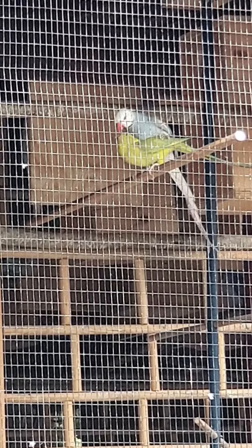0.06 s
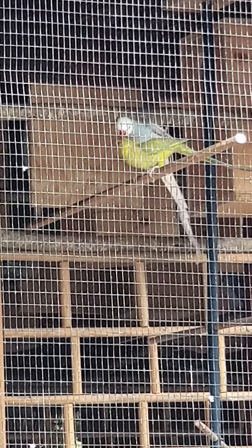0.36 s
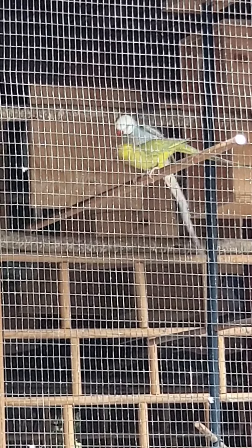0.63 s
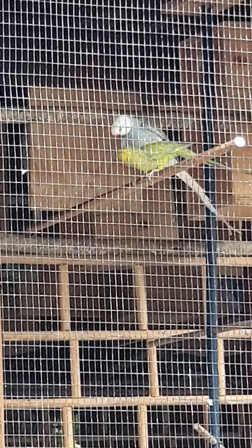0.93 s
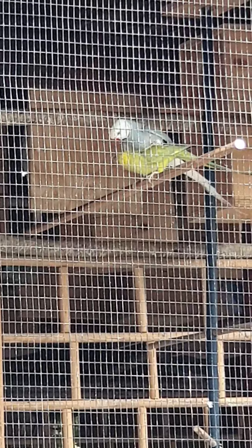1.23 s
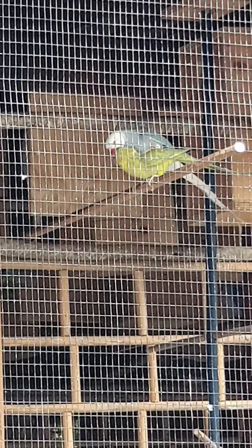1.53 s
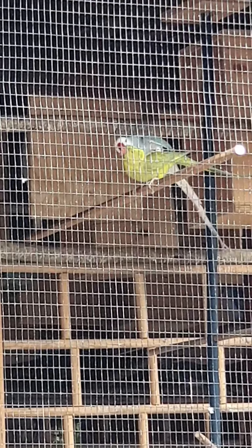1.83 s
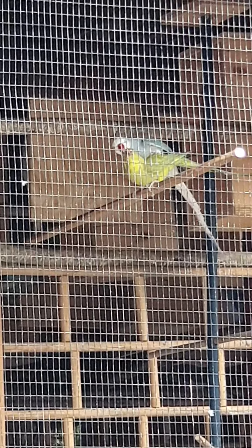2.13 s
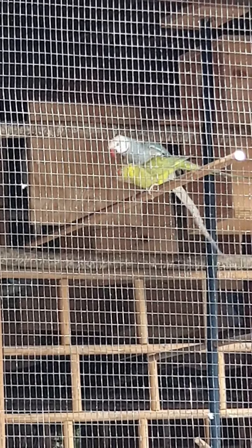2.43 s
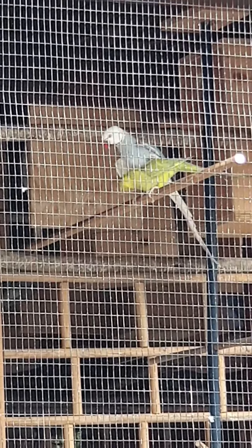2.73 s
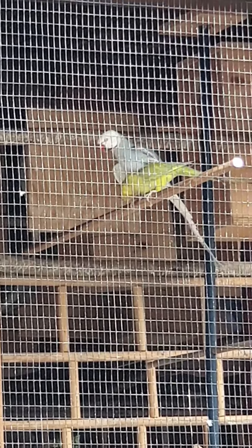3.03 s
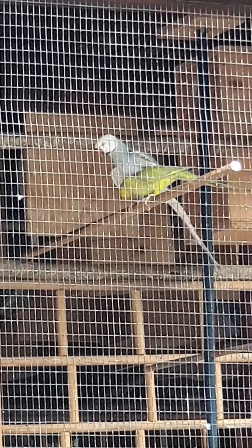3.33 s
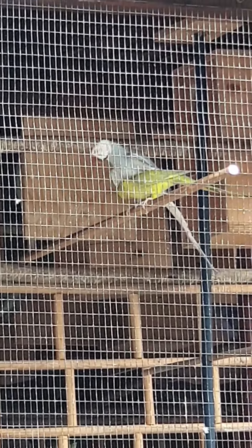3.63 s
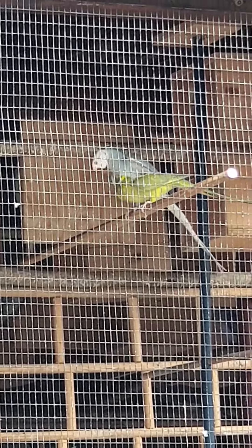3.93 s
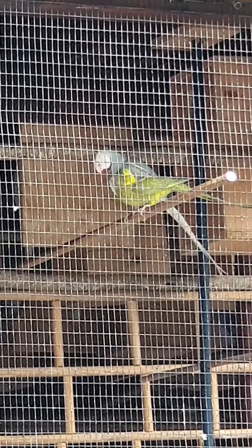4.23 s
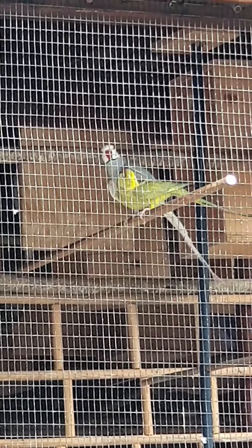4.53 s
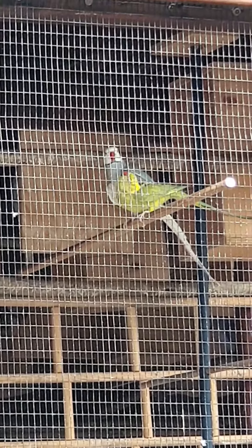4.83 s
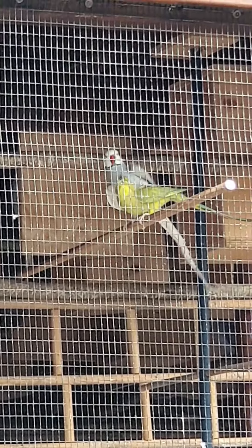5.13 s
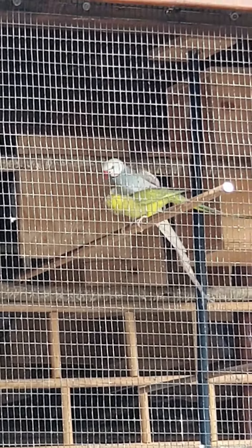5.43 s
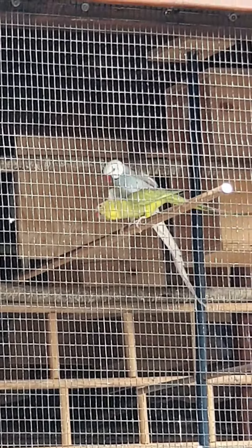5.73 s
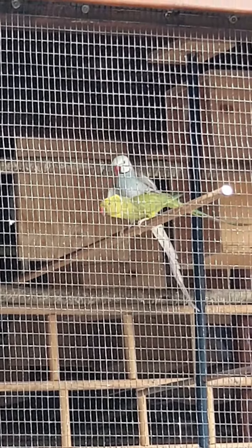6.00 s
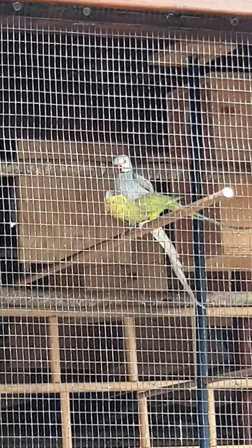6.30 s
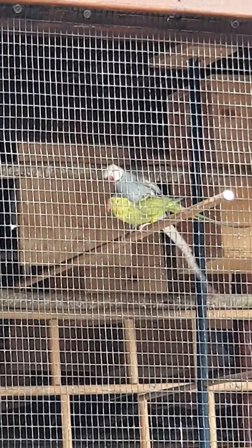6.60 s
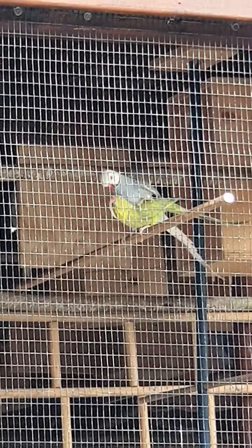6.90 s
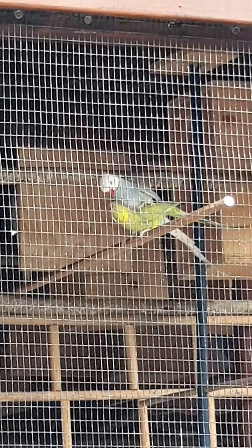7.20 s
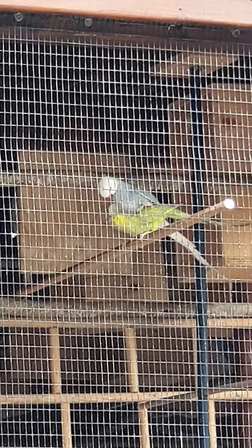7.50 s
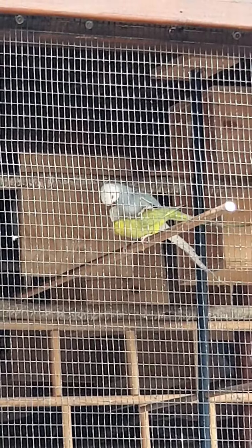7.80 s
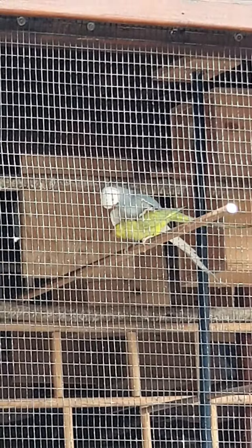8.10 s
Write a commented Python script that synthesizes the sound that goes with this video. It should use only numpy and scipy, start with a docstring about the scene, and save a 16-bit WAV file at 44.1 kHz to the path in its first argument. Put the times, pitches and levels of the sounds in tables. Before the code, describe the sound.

Parakeets call in an aviary a few metres away, with a short echo from the roof and walls, over a low outdoor rumble and faint flock chatter. A sharp falling squeal comes at about 0.7 seconds. From 1.5 to 5.3 seconds, scratchy falling squeals follow one another, mixed with thin, high peeps, while the distant flock grows slightly louder. At about 4.8 seconds a rooster close by, a little to the right, softly shakes its feathers. From 5.3 to 6.3 seconds it claps its wings seven times, each a sharp crack with a thump of air. At 6.6 seconds it starts a loud, high crow in three parts, hoarse and rasping in the middle, then clearer on a long last note that lasts to about 8 seconds. The parakeets keep peeping and squealing behind it.

```python
"""In a wire aviary with a hard roof, parakeets squeal and peep over the far chatter of the flock.
Each squeal is a falling tone, coloured by throat and beak and echoed by roof and walls.
A rooster close by shakes its feathers and claps its wings seven times, each a crack and a thump of air.
Then it crows with a high, rasping voice, hoarse in the middle and clear at the end.
A low outdoor rumble lies under it all."""
import sys
import numpy as np
from scipy import signal
from scipy.fft import rfft, irfft, next_fast_len
from scipy.io import wavfile
from scipy.ndimage import map_coordinates

SR = 44100
rng = np.random.default_rng(int(sys.argv[2]) if len(sys.argv) > 2 else 0)


def to_wav(s):
    """Save 16-bit WAV."""
    ch = np.atleast_2d(s).T  # columns
    pcm = np.round(np.clip(ch, -1, 1) * 32767)  # PCM
    wavfile.write(sys.argv[1], SR, pcm.astype(np.int16))


N = 359415
T = np.arange(N) / SR
TOP_HZ = 15800  # upper edge of the sound
ROOSTER_LAG = -8  # samples; the rooster reaches the left side first

# how a parakeet's throat and beak colour its voice: (frequency [Hz], level [dB])
BEAK = [(700, -60), (1300, -13.5), (2000, -10.5), (2750, 1.5), (3400, 8), (4300, 3), (5500, -1.5),
        (7000, -6), (9000, -5.5), (12000, -9.5), (15500, -30.5)]


def amp(db):
    """Turn decibels into a factor to multiply by."""
    return 10 ** (np.asarray(db) / 20)


def unit(x):
    """Scale a sound to an average strength (rms) of 1."""
    return x / np.sqrt(np.mean(x ** 2) + 1e-18)


def curves(table):
    """Join the rows of a table into lines through time; the first column is the time."""
    times, *columns = np.transpose(table)
    return [np.interp(T, times, column) for column in columns]


def response(points, hz):
    """Read the gain at hz from a table of (frequency [Hz], level [dB])."""
    table_hz, db = np.transpose(points)
    return amp(np.interp(np.log(hz + 1), np.log(table_hz), db))


def noise(points, size):
    """Noise of strength 1, coloured by a table of (frequency [Hz], level [dB])."""
    n = next_fast_len(size)
    spectrum = rfft(rng.standard_normal(n)) * response(points, np.arange(n // 2 + 1) * SR / n)
    return unit(irfft(spectrum, n)[:size])


def wobble(hz, size):
    """A smooth random wiggle, roughly 1 in size, that moves up to about hz times a second."""
    knots = rng.standard_normal(size // 16 + 8)
    return map_coordinates(knots, [np.arange(size) * min(2 * hz / SR, 1 / 16)], order=3, mode="mirror")


def add(track, start_s, x):
    """Mix the sound x into the track from start_s on."""
    i = max(int(start_s * SR), 0)
    track[i:i + len(x)] += x[:max(len(track) - i, 0)]


def late(x, delay_s):
    """The same sound, delay_s seconds later."""
    return np.interp(T - delay_s, T, x, left=0)


def aviary(x, echo_db, pan_db, lag_samples, ring_s, treble_ring_s, wall_db=-12, build_s=0.017):
    """Left and right get the direct sound, six bounces off roof and walls, then a dulling echo."""
    t = T[:SR]
    white = rng.standard_normal((2, SR))
    low = signal.sosfilt(signal.butter(1, 5000, fs=SR, output="sos"), white)
    # long waves reach both sides alike
    low = low + signal.sosfilt(signal.butter(1, 600, fs=SR, output="sos"), low[0] - low)
    tail = low * amp(-60 * t / ring_s) + (white - low) * amp(-60 * t / treble_ring_s)
    echo = amp(echo_db) * unit(tail * (1 - np.exp(-t / build_s))) / np.sqrt(SR)
    for when, side in rng.random((6, 2)):
        bounce_s = .004 + .024 * when
        echo[0, int(bounce_s * SR)] += amp(wall_db)
        echo[1, int((bounce_s + .0006 * (side - .5)) * SR)] += amp(wall_db)
    direct = np.array([np.roll(x, lag_samples), x])
    balance = amp(np.array([[pan_db], [-pan_db]]) / 2)  # below 0 dB leans to the right
    return (direct + signal.fftconvolve(x[None], echo, axes=1)[:, :N]) * balance


def yard(level_db=-51, side_db=-8, pan_db=-4.5):
    """Low outdoor rumble and a faint wash of far birds, swelling slowly."""
    # colour of the outdoor background: (frequency [Hz], level [dB])
    background = [(15, -63), (25, -13), (92, -3), (111, -4), (127, -14.5), (249, -12.5), (270, -11),
                  (641, -15), (840, -15), (1160, -21), (3720, -8.5), (4140, -7), (9070, -23),
                  (14000, -29.5), (16000, -44)]
    mid, side = noise(background, N), amp(side_db) * noise(background, N)
    swell_db = level_db + 0.26 * wobble(1.42, N)
    return np.array([mid + side, mid - side]) * amp(swell_db + np.array([[pan_db], [-pan_db]]) / 2)


def squeal(hold_s, fall_s, top_hz, end_hz, opening_db, rough, bend=1.45, scoop=.12, scratch=0.72):
    """A scratch, a held note, then a bright fall; the overtones slide through the beak's resonance."""
    t = np.arange(int((hold_s + fall_s + 0.015) * SR)) / SR
    fallen = np.clip((t - hold_s) / fall_s, 0, None)  # 0 while held, 1 at end_hz
    onset = np.exp(-(t / .035) ** 2)
    opening = 1 - np.clip(fallen / .35, 0, 1)
    # the voice turns harsher as it falls
    waver = .018 * wobble(60, len(t)) + .085 * (rough + .3 * fallen) * wobble(420, len(t))
    hz = (top_hz + (end_hz - top_hz) * fallen ** bend) * (1 - scoop * onset) * (1 + waver)
    phase = 2 * np.pi * np.cumsum(hz) / SR
    # the harder the bird pushes, the richer the overtones
    push_db = opening_db * opening - 3 * fallen ** 4
    tone = np.zeros(len(t))
    for k in range(1, 9):
        gain = response(BEAK, k * hz) * amp(push_db * max(k - 2, 0) + 1.6 * wobble(24.85, len(t)))
        tone += gain * (k * hz < TOP_HZ) * np.sin(k * phase)
    hiss = noise(BEAK, len(t)) * (1 + np.cos(phase) / 2) * (rough + 0.017 + scratch * onset)
    flutter = amp(2.5 * wobble(90, len(t)))
    fades = np.clip(t / .016, 0, 1) * np.clip((t[-1] - t) / .015, 0, 1)
    effort = amp(push_db - 0.7 * onset) * fades
    voice = (unit(tone) * (1 - onset / 2) + hiss) / np.sqrt(1 + rough ** 2) * effort * flutter
    # so small a beak gives off no bass
    return signal.sosfilt(signal.butter(3, 1150, "high", fs=SR, output="sos"), voice)


def flock(count=44, far_db=-58, scatter_db=3, lively_db=5):
    """Birds in further cages, heard mostly as echo; they grow louder from 1.3 to 3 seconds."""
    out = np.zeros(N)
    for k, (when, pitch, length, strength) in enumerate(rng.uniform(-1, 1, (count, 4))):
        start = (k + .5 + .5 * when) * T[-1] / count
        call = squeal(hold_s=.06 + .02 * length, fall_s=.09, top_hz=2200 + 500 * pitch,
                      end_hz=1650 + 200 * pitch, opening_db=-2.3, rough=0.683)
        db = far_db + scatter_db * strength + lively_db * np.interp(start, [1.3, 3], [0, 1])
        add(out, start, amp(db) * call)
    return aviary(out, echo_db=10, pan_db=0, lag_samples=0, ring_s=0.32, treble_ring_s=0.022)


def whistle(length_s, start_hz, end_hz, second_db, third_db, rasp_db=-14):
    """A slightly husky note with two overtones that settles from its first pitch to its last."""
    size = int(length_s * SR)
    progress = np.linspace(0, 1, size)
    waver = .016 * wobble(60, size) + .032 * wobble(450, size)
    hz = (end_hz + (start_hz - end_hz) * (1 - progress) ** 1.675) * (1 + waver)
    phase = 2 * np.pi * np.cumsum(hz) / SR
    tone = np.sin(phase) + amp(second_db) * np.sin(2 * phase) + amp(third_db) * np.sin(3 * phase)
    voice = np.sqrt(2) * tone + amp(rasp_db) * noise(BEAK, size)
    fades = np.clip(progress / 0.1, 0, 1) * np.clip((1 - progress) / 0.13, 0, 1)
    return voice * fades * amp(-4 * progress + 3.3 * wobble(79, size))


def parakeets(squeal_db=-1, note_db=-2, squeal_end_hz=1584, climb_hz_per_s=19000, droop=0.0539):
    """The near birds, a few metres off behind the wire, and a few low calls from beyond them."""
    # faint far calls: (start [s], length [s], start pitch [Hz], end pitch [Hz], level [dB])
    far_calls = [(0.504, 0.1, 824, 589, -57), (1.499, 0.42, 659, 790, -66), (3.521, 0.213, 800, 736, -55)]
    # falling squeals:
    # (start [s], end [s], top pitch [Hz], level [dB], opening against the fall [dB], roughness [0-1])
    squeals = [(0.655, 0.802, 2285, -24.5, 0, 0), (1.479, 1.63, 2702, -27, -7, 0.24),
               (1.616, 1.775, 2846, -27, -2, 0.08), (2.121, 2.292, 2692, -28.5, -6, 0.19),
               (2.688, 2.855, 2860, -28, -7, .25), (2.936, 3.082, 2574, -28, -6.5, 0.08),
               (3.175, 3.325, 2488, -30.5, -8, 0.22), (3.447, 3.627, 2775, -25.5, -6, 0.2),
               (3.687, 3.826, 2535, -27.5, -4, 0.1), (3.897, 4.049, 2680, -31, -4.5, 0.4),
               (4.273, 4.456, 2816, -26, -7, 0.23), (4.392, 4.529, 2540, -26, -13, 0.33),
               (5.12, 5.298, 2800, -24, -2.5, 0.18), (7.004, 7.155, 2577, -27.5, -10, 0.21),
               (7.486, 7.637, 2636, -27.5, -1.5, 0.41), (7.653, 7.778, 2636, -33.5, -7.5, 0.6)]
    # soft nasal chatter, rich in overtones: (start [s], length [s], pitch [Hz], level [dB])
    chatter = [(1.058, 0.08, 1778, -47), (1.393, .095, 1753, -46.5), (1.92, 0.17, 1383, -56)]
    # thin, nearly pure peeps: (start [s], length [s], pitch [Hz], level [dB])
    peeps = [(1.511, 0.066, 3820, -25), (2.159, 0.055, 3640, -27.5), (2.376, 0.074, 3560, -37),
             (2.95, 0.093, 3500, -26), (3.196, 0.06, 3460, -31.5), (3.731, 0.044, 3400, -24),
             (4.651, 0.099, 3986, -39.5), (5.153, 0.071, 3530, -25), (5.597, 0.097, 3200, -30),
             (5.939, 0.12, 3770, -32.5), (6.214, 0.092, 4550, -35), (6.256, 0.0696, 3780, -29),
             (6.555, 0.096, 4000, -45), (6.797, 0.15, 2900, -43.5), (7, 0.084, 3540, -27),
             (7.596, 0.12, 3740, -30)]
    out = np.zeros(N)
    for start, end, top_hz, db, opening_db, rough in squeals:
        hold_s = (top_hz - squeal_end_hz) / climb_hz_per_s  # higher squeals hold their opening longer
        call = squeal(hold_s, end - start - hold_s, top_hz, squeal_end_hz, opening_db, rough)
        add(out, start, amp(db + squeal_db) * call)
    for notes, second_db, third_db in [(peeps, -29, -18), (chatter, 0.5, -0.5)]:
        for start, length, hz, db in notes:
            call = whistle(length, hz, hz * (1 - droop), second_db, third_db)
            add(out, start, amp(db + note_db) * call)
    for start, length, start_hz, end_hz, db in far_calls:
        call = whistle(length, start_hz, end_hz, second_db=-26, third_db=-6)
        add(out, start, amp(db + note_db) * call)
    hollow_call = whistle(length_s=0.048, start_hz=1448, end_hz=1122, second_db=-35, third_db=-4.5)
    add(out, 4.637, amp(-28) * hollow_call)
    return aviary(out, echo_db=-0.5, pan_db=-1.9, lag_samples=2,
                  ring_s=0.54, treble_ring_s=0.4, wall_db=-13.5)


def gust(start_s, rise_s=0.01, hold_s=0.026, fade_db_per_s=129):
    """The strength of the air stirred by one wing stroke: it rises, holds and dies away."""
    age = T - start_s
    return np.clip(age / rise_s, 0, 1) * amp(-fade_db_per_s * np.maximum(age - hold_s, 0))


def wings(crack_s=0.0032, rustle_s=0.0018, thump_hz=138, thump_s=0.013, full_clap_db=-16):
    """Each clap is a crack of feathers and a thump of air; the ground and then a wall send it back."""
    # a soft shake, seven claps and a last light flick: (time [s], crack level [dB], thump level [dB])
    strokes = [(4.831, -27.5, -30.5), (4.93, -33.5, -28), (4.981, -38, -33.5), (5.091, -28.5, -32.5),
               (5.345, -12, -30), (5.482, -12.5, -26.5), (5.629, -12, -18.5), (5.787, -14, -21),
               (5.95, -16, -22), (6.117, -11, -34.5), (6.295, -11, -32.5), (6.601, -28.5, -61)]
    # colour of the cracking feathers: (frequency [Hz], level [dB])
    crack = [(150, -16.5), (500, 9), (900, 5.5), (1600, 8), (2700, 2), (4000, 3.5), (5400, 8), (7200, 2.5),
             (10500, -0.5), (13000, -0.5), (16000, -16)]
    # colour of the stirred air: (frequency [Hz], level [dB])
    draught = [(25, -45), (60, 8), (140, -2), (220, -2.5), (340, -2), (700, -16), (2000, -10.5),
               (6000, -19), (14000, -27)]
    out, t = np.zeros(N), T[:SR // 5]
    attack = 1 - np.exp(-t / 0.0004)
    for start, crack_db, thump_db in strokes:
        feathers = noise(crack, len(t)) * (np.exp(-t / crack_s) + amp(-18) * np.exp(-t / rustle_s))
        # strokes softer than a full clap thump lower, by an octave for every 20 dB
        hz = thump_hz * 2 ** (min(crack_db - full_clap_db, 0) / 20)
        thump = np.sin(2 * np.pi * hz * t * rng.uniform(.92, 1.12)) * np.exp(-t / thump_s)
        add(out, start, (amp(crack_db) * feathers + amp(thump_db) * thump) * attack)
    ground = amp(-6) * late(out, .0052)
    wall = amp(-7) * signal.sosfilt(signal.butter(1, 5000, fs=SR, output="sos"), late(out, .033))
    # the harder the stroke, the more air it stirs
    gusts = sum(amp((crack_db + thump_db) / 2) * gust(start) for start, crack_db, thump_db in strokes)
    air = amp(-13) * gusts * noise(draught, N)
    return aviary(out + ground + wall + air, echo_db=-5, pan_db=-3, lag_samples=ROOSTER_LAG,
                  ring_s=0.41, treble_ring_s=0.34, wall_db=-22)


def crow_effort(syllables, end_s=8.33, slack_hz=696, rise_bend=2.4, sag_bend=1.8):
    """Each syllable is an arch of effort that lasts until the next; the pitch climbs with it."""
    starts, crests, top_hz, db, shrill_db = np.transpose(syllables)
    effort, hz = np.zeros(N), np.full(N, float(slack_hz))
    for start, crest, end, top in zip(starts, crests, [*starts[1:], end_s], top_hz):
        rise = np.clip((crest - T) / (crest - start), 0, 1)
        sag = np.clip((T - crest) / (end - crest), 0, 1)
        arch = 1 - rise ** rise_bend - sag ** sag_bend
        effort += arch
        hz += (top - slack_hz) * arch
    return effort, hz, np.interp(T, crests, db), np.interp(T, crests, shrill_db)


def crow(jitter=0.0389, shimmer=0.68, unsteady_db=1.65, attack_s=0.026):
    """A high voice whose octave rings in the throat; when hoarse it wavers and rasp takes over."""
    # parts of the crow: (start [s], crest [s], top pitch [Hz], level [dB], shrillness [dB])
    syllables = [(6.625, 6.776, 806.8, -19.5, 4.5), (6.889, 7.076, 785.7, -21, 2.5),
                 (7.499, 7.822, 797, -20.5, 7)]
    # how hoarse the voice is: (time [s], hoarseness [0-1])
    hoarseness = [(6.63, 0.66), (6.7, 0.18), (6.88, 0.91), (6.97, 0.52), (7.06, .6), (7.5, 0.79), (7.62, 0),
                  (7.88, 0.3), (8.02, 0)]
    # colour of the rasp through the rooster's throat: (frequency [Hz], level [dB])
    throat = [(350, -10), (650, 12), (1000, 3), (1350, 18), (1720, 29), (2000, 14.5), (2350, 20),
              (2900, 7.5), (3800, -8.5), (5900, 7), (7000, -7), (7900, 7), (9200, -16), (10400, 1),
              (11700, -0.5), (14500, -12)]
    effort, hz, level_db, shrill_db = crow_effort(syllables)
    slack = 1 - effort
    hoarse, = curves(hoarseness)
    # effort feeds the octave most; hoarseness shifts the weight to the base note
    octave_gain = amp(level_db - 4 * slack - 6 * hoarse + unsteady_db * wobble(14, N))
    base_gain = amp(-34 - 2 * slack + 5 * hoarse + unsteady_db * wobble(19, N))
    waver = 0.00914 * wobble(25, N) + jitter * (hoarse + 0.076) * wobble(130, N)
    phase = 2 * np.pi * np.cumsum(hz * (1 + waver)) / SR

    def partial(multiple):
        """A tone at one multiple of the pitch, fluttering with the hoarseness."""
        return np.sqrt(2) * np.sin(multiple * phase) * (1 + shimmer * hoarse * wobble(150, N))

    voice = base_gain * partial(1) + octave_gain * partial(2)
    # strong and weak cycles alternate, which puts a faint tone between the first two
    overtones = amp(-31) * partial(1.5) + amp(-18) * (1 - hoarse / 2) * partial(3)
    shrill = sum(response(throat, k * hz) * partial(k) * amp(4.3 * wobble(41, N)) for k in range(4, 17))
    rasp_gain = amp(-9 + 3.5 * wobble(40, N)) * (hoarse + 0.052)
    rasp = rasp_gain * noise(throat, N) * (1 + 0.26 * np.cos(phase))
    harshness = amp(shrill_db - 4 * slack) * (amp(-41) * shrill + rasp)
    fade_in = np.clip((T - syllables[0][0]) / attack_s, 0, 1) ** 2
    out = (voice + (base_gain + octave_gain) * (overtones + harshness)) * fade_in
    return aviary(amp(1) * out, echo_db=-7, pan_db=-4.5, lag_samples=ROOSTER_LAG,
                  ring_s=.48, treble_ring_s=.3, wall_db=-21)


def scene():
    """Parakeets, rooster and yard together, in stereo."""
    return parakeets() + flock() + wings() + crow() + yard()


def record(dry):
    """The microphone cuts the deep bass and the highest treble."""
    thin = signal.sosfilt(signal.butter(3, 48, "high", fs=SR, output="sos"), dry)
    return signal.sosfilt(signal.ellip(8, .2, 70, TOP_HZ, fs=SR, output="sos"), thin)


dry = scene()
out = record(dry)
to_wav(out)
```